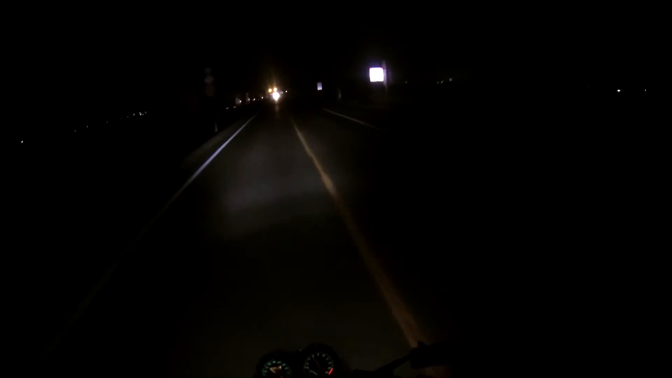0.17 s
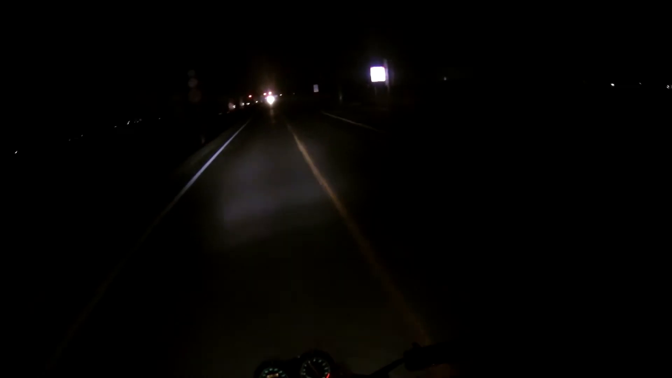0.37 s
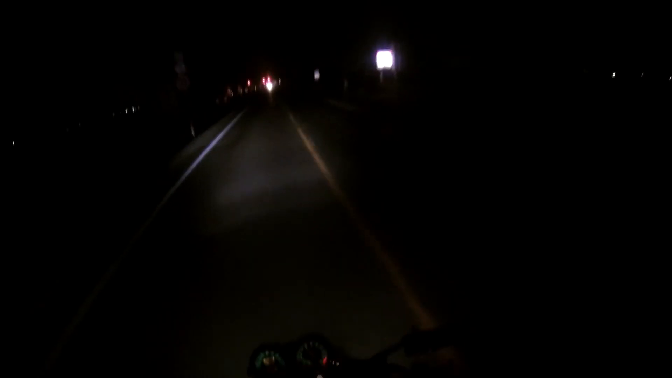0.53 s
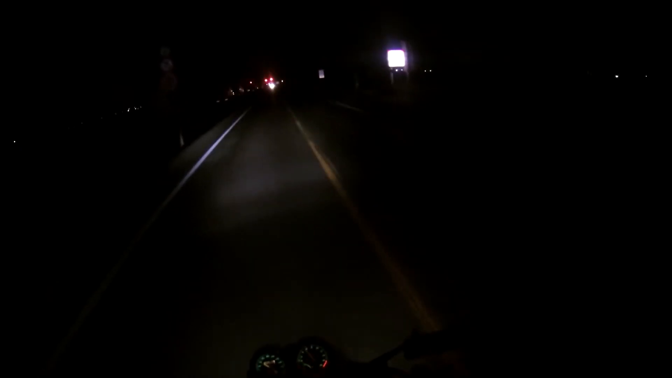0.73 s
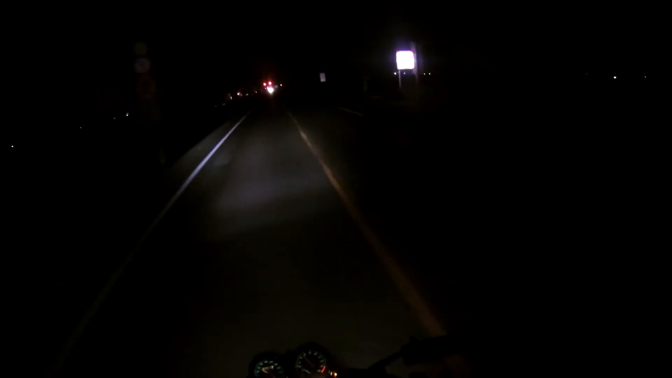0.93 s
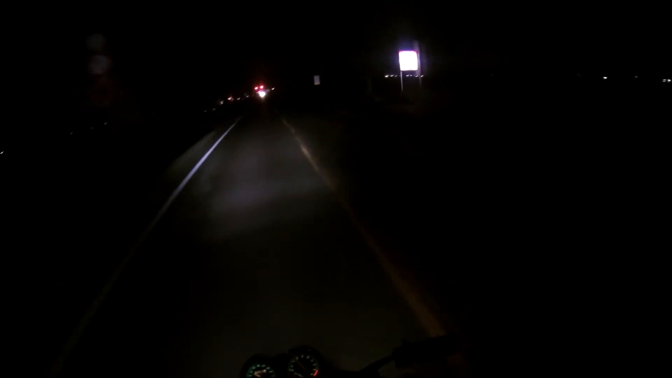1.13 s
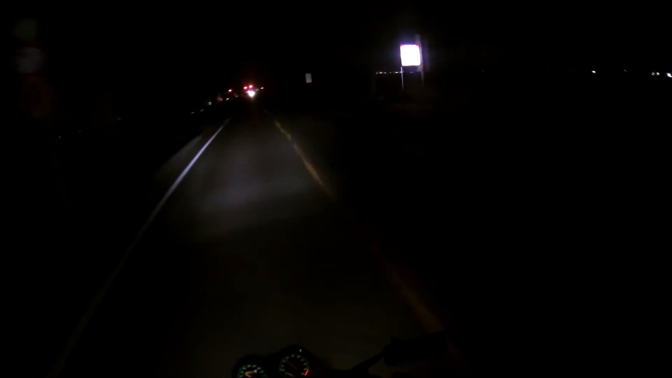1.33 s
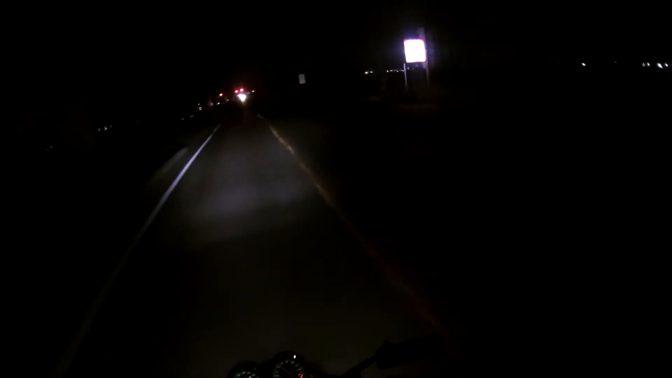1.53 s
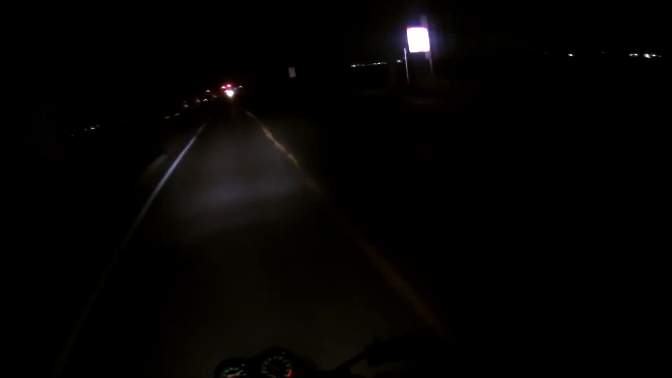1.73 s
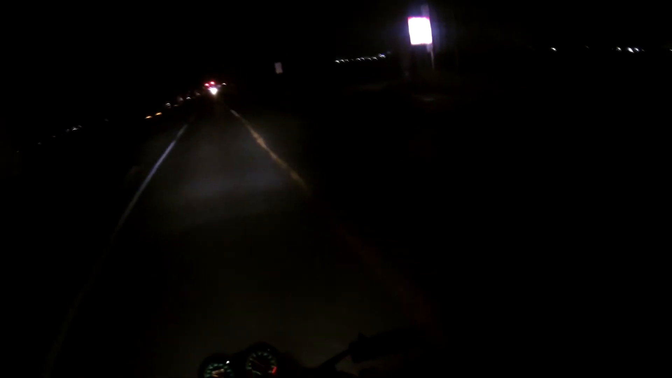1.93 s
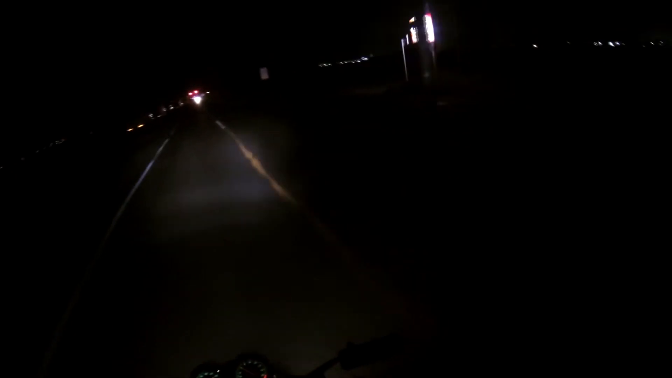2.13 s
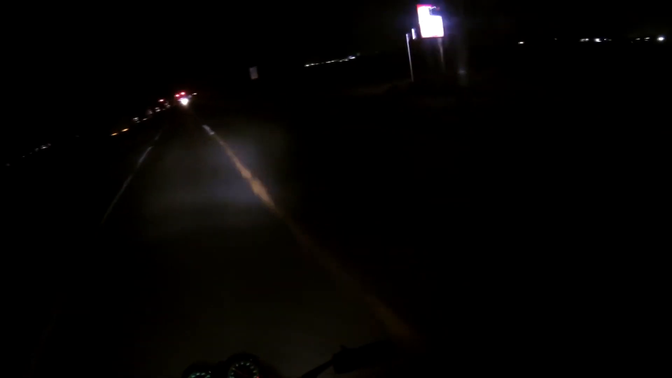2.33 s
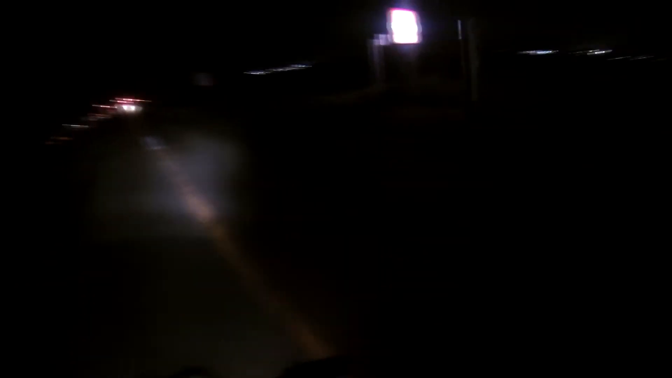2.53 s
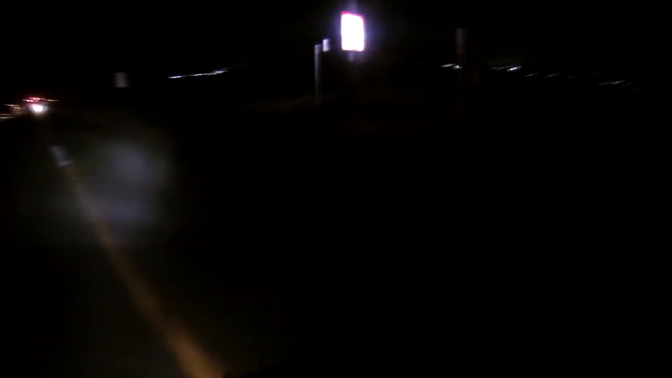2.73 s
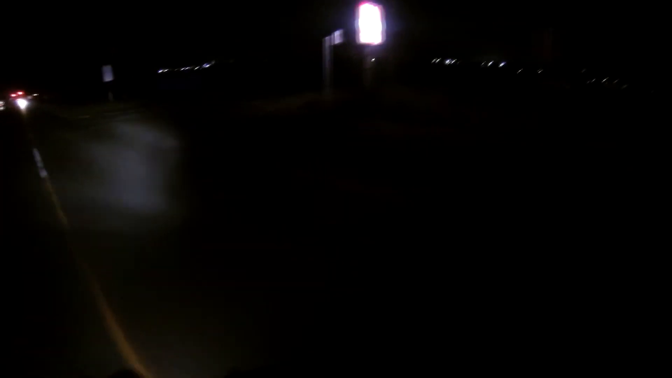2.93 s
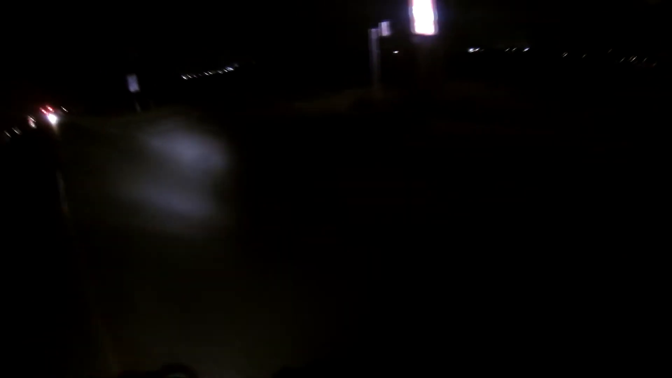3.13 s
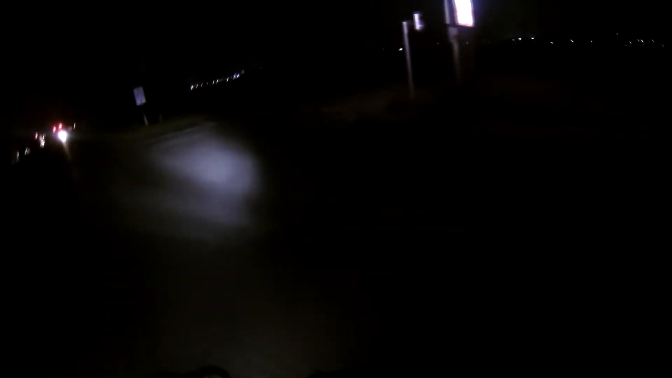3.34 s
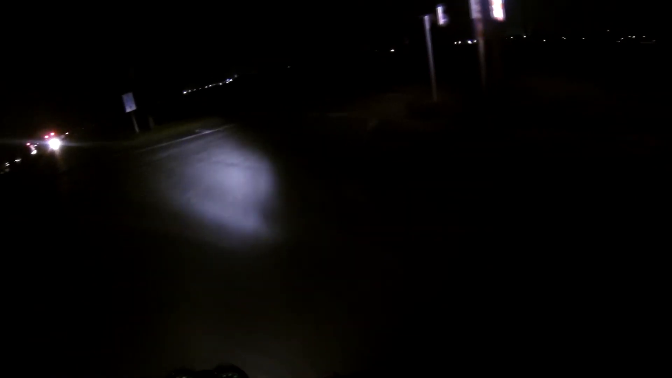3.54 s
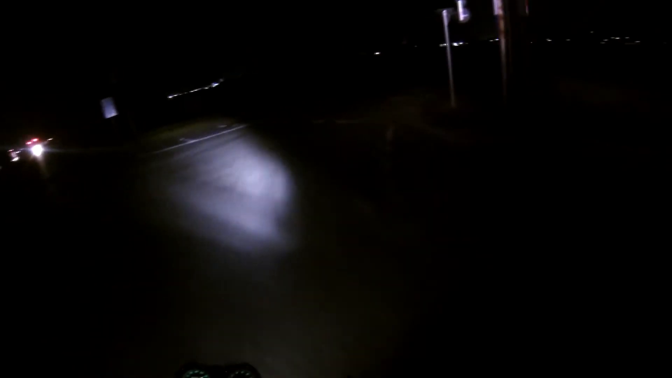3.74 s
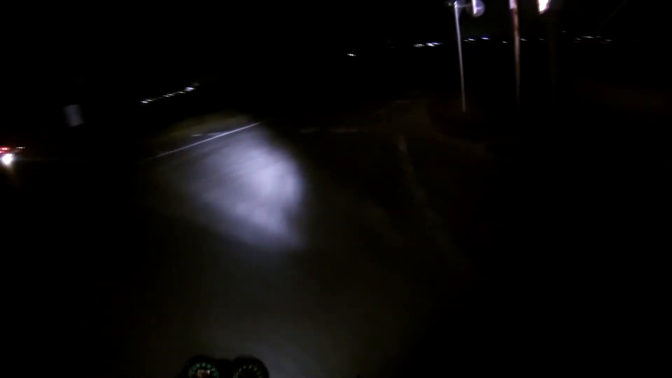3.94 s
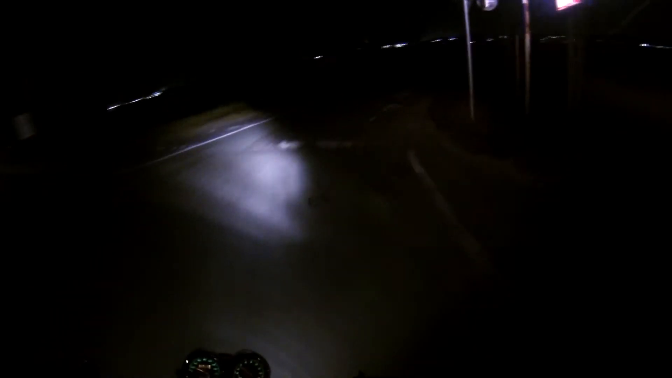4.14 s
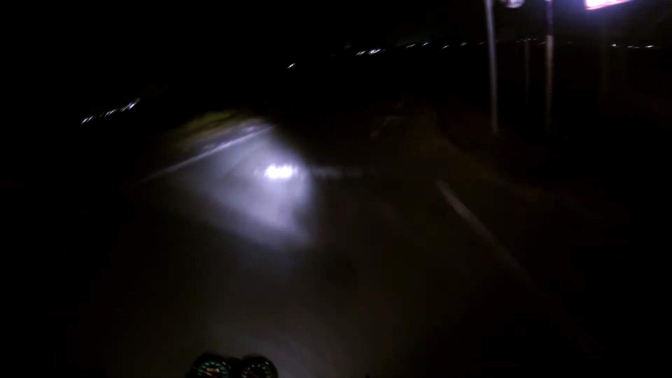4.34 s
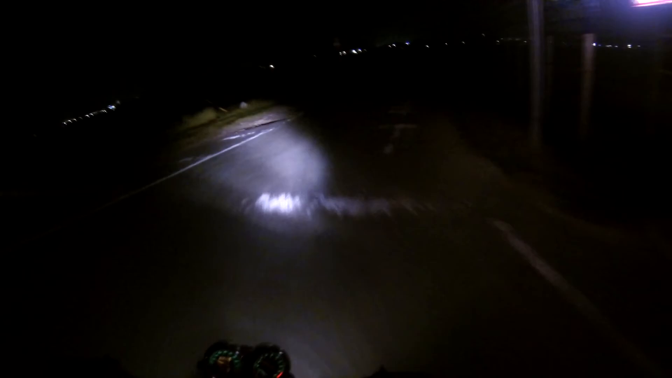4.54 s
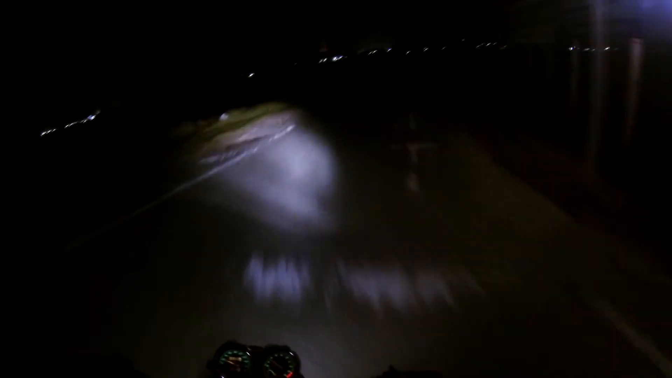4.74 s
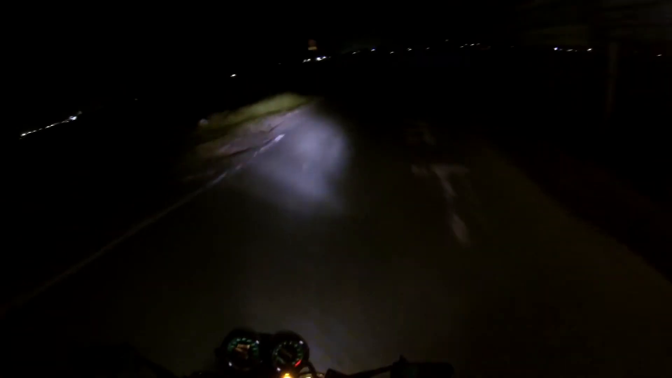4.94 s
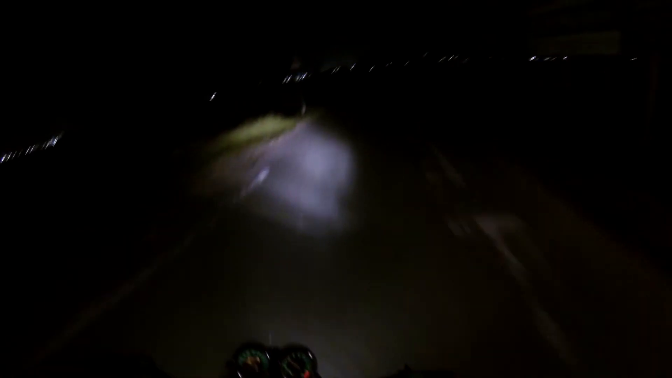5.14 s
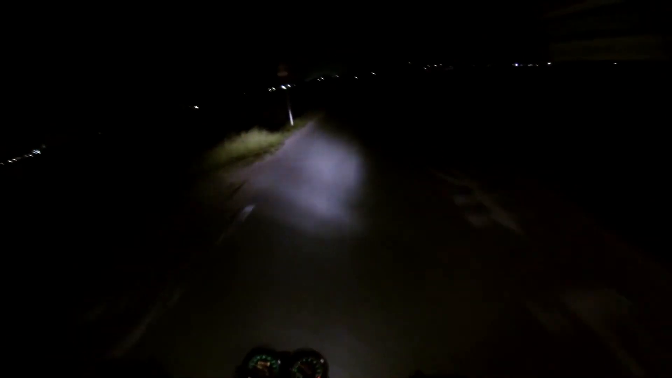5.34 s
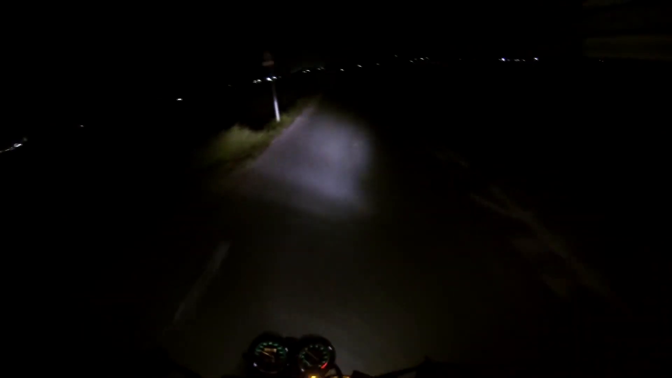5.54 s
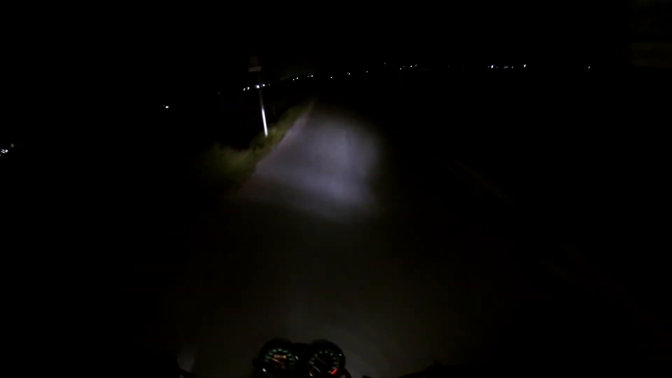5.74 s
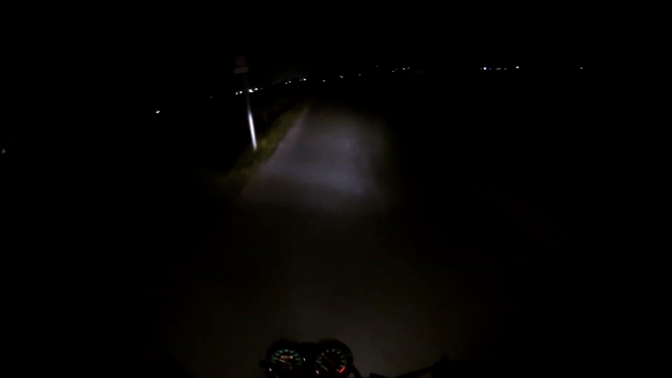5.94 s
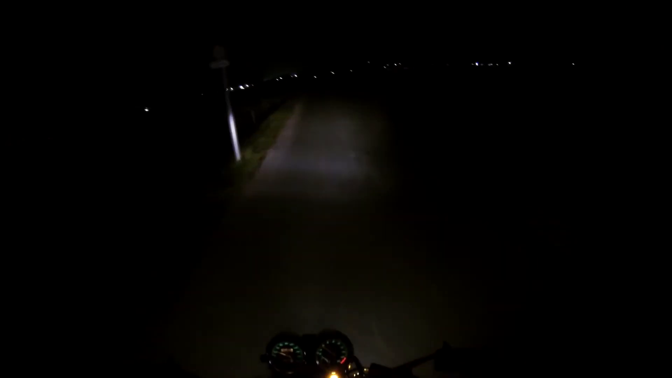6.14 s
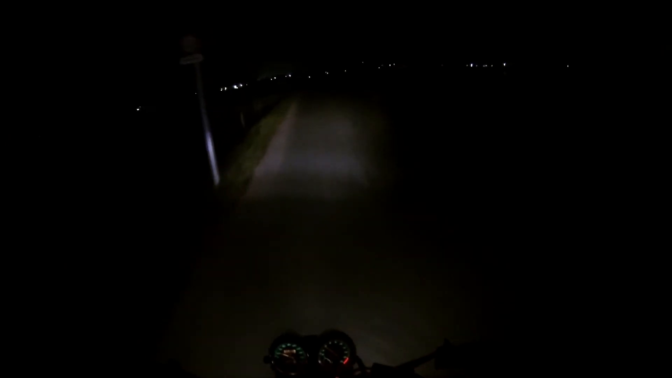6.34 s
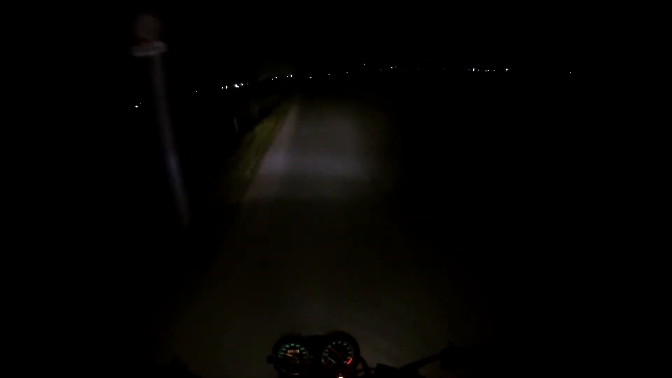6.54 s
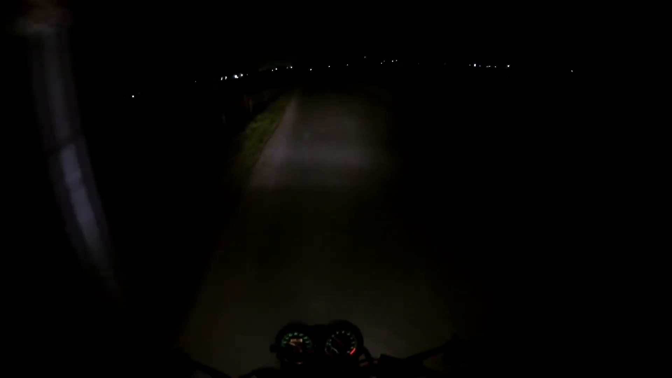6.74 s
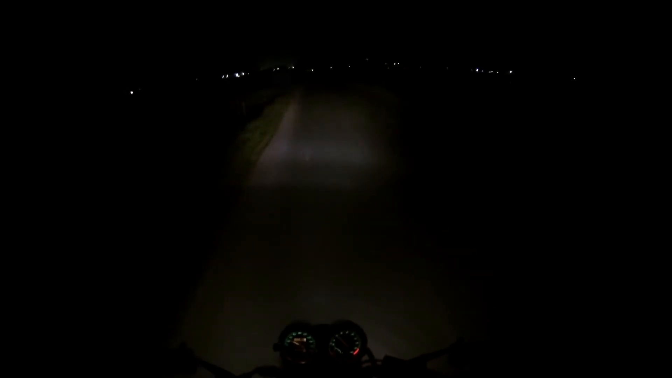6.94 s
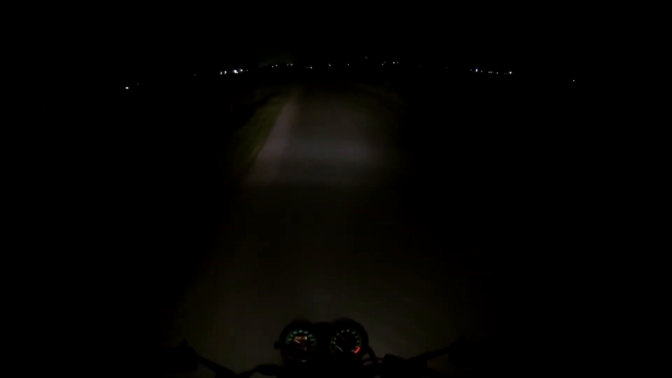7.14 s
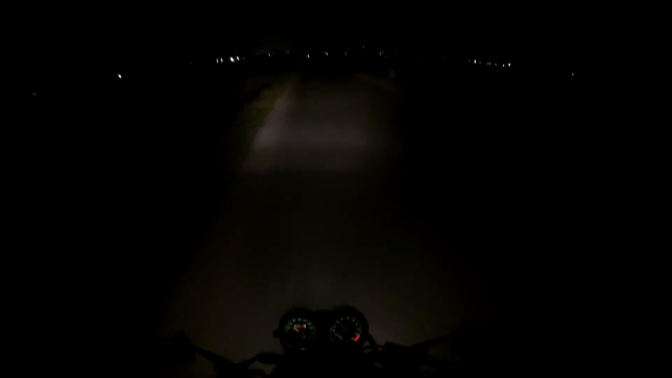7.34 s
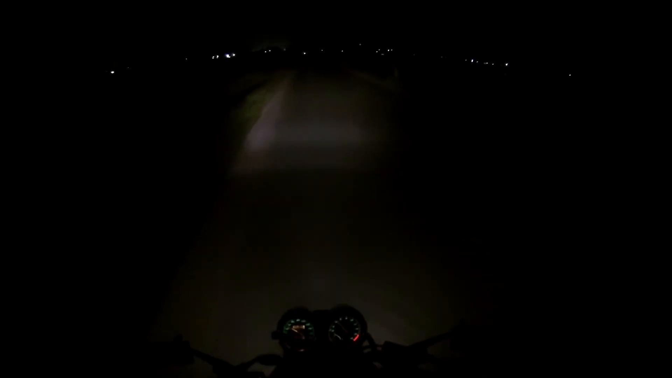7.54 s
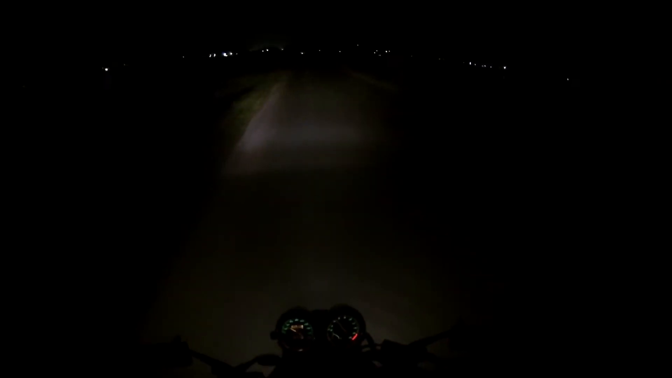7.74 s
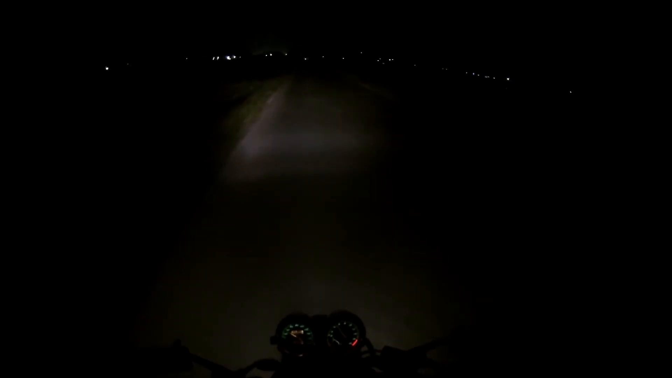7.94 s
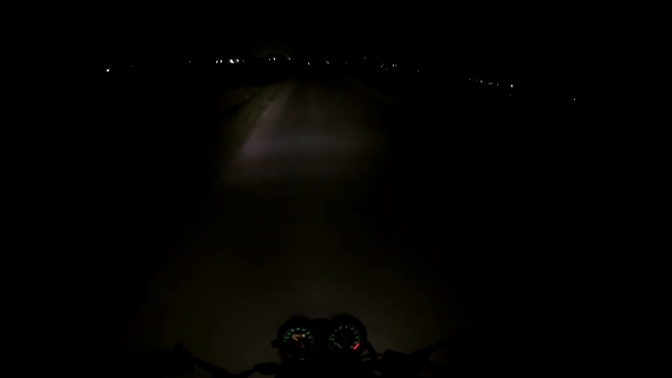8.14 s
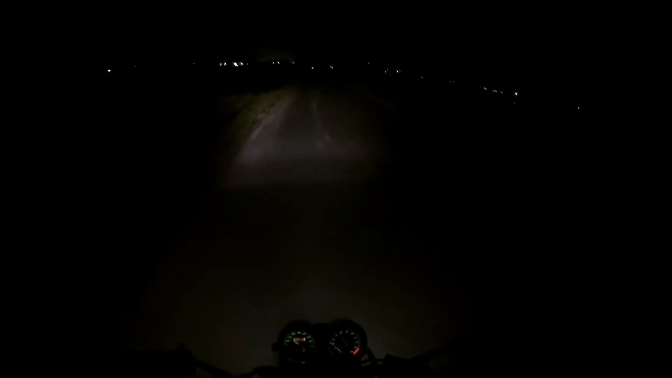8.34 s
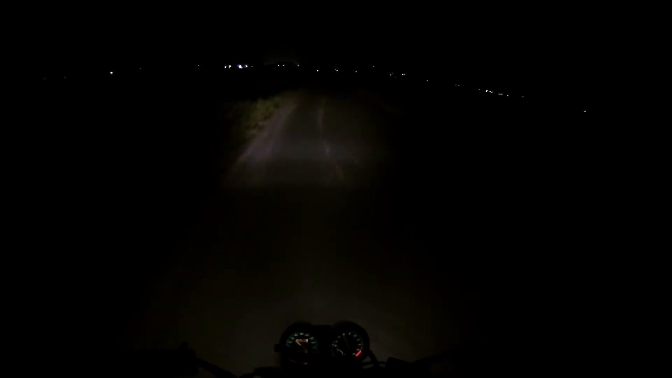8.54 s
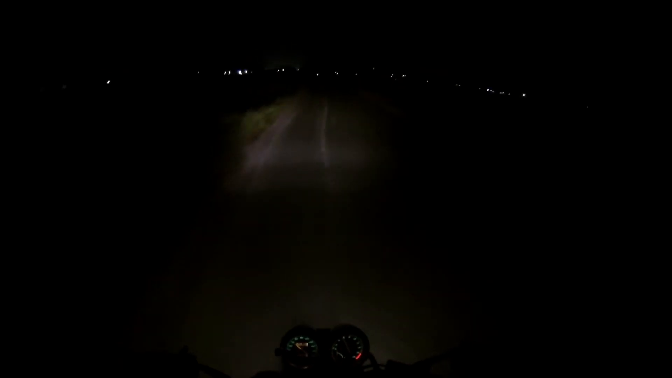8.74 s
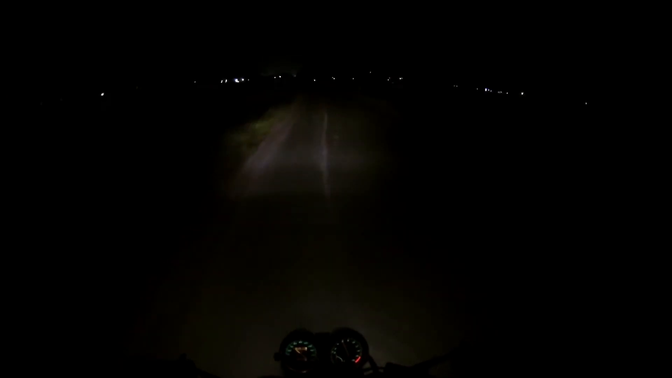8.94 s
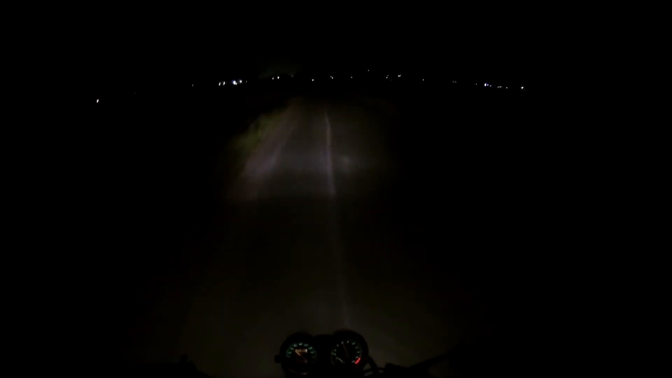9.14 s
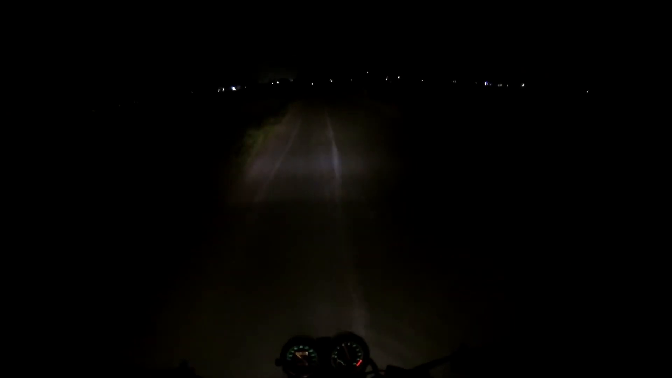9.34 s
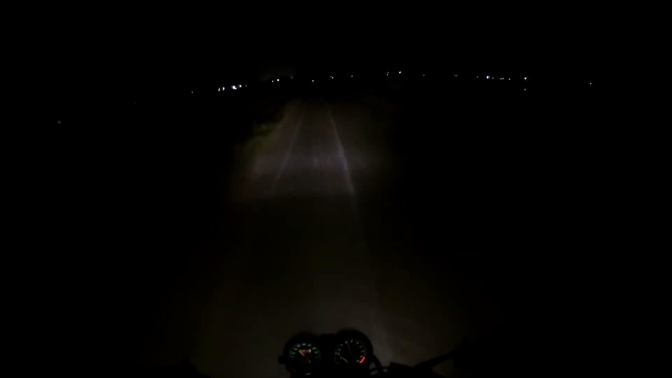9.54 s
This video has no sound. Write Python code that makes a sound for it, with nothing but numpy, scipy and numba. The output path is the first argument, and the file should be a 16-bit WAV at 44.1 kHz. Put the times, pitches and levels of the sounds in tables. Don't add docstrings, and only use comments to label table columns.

```python
import sys
import numpy as np
from scipy import signal
from scipy.fft import rfft, irfft
from scipy.io import wavfile
from scipy.ndimage import uniform_filter1d
from numba import njit

SR = 44100
rng = np.random.default_rng(int(sys.argv[2]) if len(sys.argv) > 2 else 0)


def to_wav(s):
    ch = np.atleast_2d(s).T
    pcm = np.round(np.clip(ch, -1, 1) * 32767)
    wavfile.write(sys.argv[1], SR, pcm.astype(np.int16))


def linear_from_db(decibels):
    return 10 ** (np.asarray(decibels, float) / 20)


N = 426888

# start_s, firing_rate_hz
ENGINE_SPEED = [(0, 183.5), (.64, 167.7), (1.76, 137.1), (2.4, 123.6), (3.36, 112.1), (4, 109.1),
                (4.36, 106), (4.45, 108.9), (4.51, 115.3), (4.57, 104), (4.76, 108.5), (5.1, 109),
                (5.3, 111.9), (5.77, 117.5), (6.41, 128.2), (7.21, 147), (8.49, 178.6), (9.68, 206.9)]
# start_s, opening (0-1), rasp_db per octave above 600 Hz, low_order_load_db, burble_db
THROTTLE = [(0, 0.07, -5, 3.2, 6), (.5, 0.45, -4, -0.7, 2.5), (.9, 0.16, 4, 1, 3), (1.6, 0, -1, 0.1, 1),
            (2.6, 0, 1, -0.2, 2), (3.9, 0, 9, -1.7, 3.5), (4.2, 0.48, 2, -3, 9.3),
            (4.4, 0.94, -14, -2.5, 2), (4.55, 0.92, -12, -0.5, 5.5), (5.3, 0.99, -8, 0, -5.5),
            (5.9, 0.95, -6.5, 0.5, 1.5), (6.5, 0.91, -6.5, 2, 0), (6.8, 0.91, 11, 1.8, 1),
            (7.1, 0.97, 0, .3, -2), (7.5, 0.92, -4, 1, -5.5), (8, 1, -0.5, -2, 1),
            (8.8, 0.94, 5.5, 0.36, 4.5), (9.68, 0.97, 7, -0.3, -4)]
# open_throttle_db, shut_throttle_db
LOW_ORDERS = [(11, 12), (0, 0), (-3, -7), (-9, -15)]
# pitch_hz, level_db
OPEN_CAVITY = [(100, -51), (250, -32), (330, -28), (380, -19), (415, -17), (465, -46), (600, -31.5),
               (830, -42)]
# pitch_hz, level_db
SHUT_CAVITY = [(100, -56), (245, -42), (282, -48), (322, -33), (358, -26), (398, -37), (425, -56),
               (740, -36)]
# pitch_hz, level_db
UPPER_COLOUR = [(500, 6.5), (660, 3.5), (750, 3), (830, -3), (950, -15.5), (1050, -10), (1500, -13.5),
                (1800, -27), (2300, -39.5), (3100, -34)]
# pitch_hz, width_hz, lift_db
PANELS = [(975, 60, 7), (1150, 60, 9), (1290, 50, 8), (1420, 70, 14), (2125, 60, 8), (3050, 500, -9)]
FED_ORDERS = {7: 3, 8: 2, 10: 5, 11: 4}
# multiple of firing rate, level_db re throttle
UNEVEN_LINES = [(.5, -5), (1.25, -8), (1.5, 2.5), (2.5, -12), (3.5, -2.5), (4.501, -8.5), (5.499, -9.5),
                (7.5, -4.5), (9.5, -14.5)]
# pitch_hz, level_db
UNEVEN_COLOUR = [(50, -13), (90, 7.5), (170, 3), (240, 5.5), (275, -6.5), (300, -16.5), (350, 7.5),
                 (420, 10.5), (500, -12.5), (1400, 1)]
# pitch_hz, level_db
CHAIN_COLOUR = [(1650, -74), (1900, -60), (2060, -57), (2105, -46), (2150, -46), (2185, -56), (2290, -58),
                (2420, -76)]
# multiple of firing rate, level_db
WHINE = [(20, -5), (30, 4), (40, 4), (50, 1), (60, 0)]
# pitch_hz, level_db
WHINE_COLOUR = [(2000, -70), (2250, -66), (2800, -76), (3400, -73), (4400, -83), (5250, -76), (5700, -73),
                (6050, -78), (6400, -75), (6900, -83), (7500, -87), (8300, -82), (9300, -88), (10500, -110)]
# pitch_hz, width_hz, level_db
BOOM = [(348, 28, -1), (378, 26, 0), (402, 22, -8)]
# time_s, length_ms, depth_db
MISFIRES = [(2.097, 24, -9), (2.193, 16, -9), (2.271, 21, -12), (2.399, 40, -9), (2.661, 47, -10),
            (2.751, 26, -11), (2.862, 25, -9), (2.957, 17, -8), (3.003, 41, -9), (3.13, 15, -16),
            (3.166, 19, -14), (3.228, 21, -8), (3.271, 21, -11), (3.362, 35, -10), (3.446, 29, -18),
            (3.544, 14, -10), (3.667, 20, -16), (3.778, 23, -13), (3.885, 22, -19), (3.99, 28, -12),
            (4.064, 28, -10), (4.145, 30, -9)]
# pitch_hz, width_hz, level_db, share of the swing with speed
HOUSING = [(466, 91, -14, 1.4), (678, 194, -6.5, 0.72), (987, 120, -9, 0.88), (1164, 88, -7.5, 0.99),
           (1384, 190, 1.5, 1.195), (1569, 124, -0.5, 1.08), (2192, 183, -5, 0.91), (2610, 500, -19, 1.48),
           (3260, 500, -11.5, 0.82), (3920, 620, -39, 0.76), (5133, 400, -19.5, 0.72),
           (5880, 250, -28.5, 0.7), (6400, 1200, -29.5, 0.75), (8300, 2500, -39.5, 0.67),
           (10600, 4400, -45, 0.49)]
# pitch_hz, level_db per Hz
BUFFET = [(20, -8), (35, -7), (60, -1.5), (120, -16), (200, -15.5), (300, -19.5), (450, -25), (800, -38.5),
          (2000, -52.5), (4300, -60.5), (8000, -83), (14500, -87.5)]
# time_s, length_s, level_db
GUSTS = [
    (.25, .15, 1.2),
    (.9, 0.22, 1),
    (2.014, 0.09, 2.5),
    (2.8, 0.68, 1.8),
    (4.57, 0.02, -1),
    (5.45, .1, 1.2),
    (6.995, .15, -0.5),
    (7.75, 0.53, -2),
    (8.45, .15, 0),
    (9, 0.43, -1.8),
]
# pitch_hz, width_hz, level_db
WHISTLES = [(4240, 70, -80), (4550, 70, -81), (5010, 70, -76), (5330, 50, -74), (5720, 70, -79),
            (6450, 110, -80), (7100, 120, -86), (8450, 90, -93)]
# time_s, level_db
JOINTS = [(.07, -28), (.26, -34), (.42, -31.5), (0.632, -25.5), (.93, -28), (1.36, -27.5), (1.7, -34),
          (2.052, -27.5), (2.68, -28), (3.22, -39), (5.78, -31.5), (7.53, -34.5), (7.671, -37), (7.91, -36),
          (8.191, -32), (8.351, -24), (8.751, -31), (8.969, -27), (9.169, -30.5), (9.42, -30.5),
          (9.6, -30.5)]
# time_s, level_db, pitch_hz
BUMPS = [(.07, -23, 16), (.19, -29, 44), (.31, -20.5, 16), (.53, -17, 14.7), (.7, -21.5, 13.6),
         (.87, -22, 15.3), (1.07, -27, 15), (1.19, -30, 32.6), (1.35, -24.5, 35.5), (1.51, -18, 15),
         (1.54, -37, 29), (1.74, -26, 27.2), (1.67, -18.5, 15), (1.84, -16, 17.3), (2.39, -27, 14),
         (3.33, -28, 17), (4.05, -24, 13), (4.33, -23.5, 11.1), (4.51, -24.5, 17), (4.78, -27, 14),
         (4.95, -21.5, 15), (6.02, -28, 7.1), (6.55, -30, 12), (7.16, -38, 26), (8.56, -28, 15),
         (9.18, -28, 14), (9.56, -33, 33), (9.64, -23.5, 14)]
# start_s, peak_db, ring_hz
STONES = [
    (5.3114, -20, 2170),
]
# lag_s, level_db, pitch ratio
BOUNCES = [(0, 6.5, 0.99), (0.00034, -1.0, 0.69), (.0003, -9, 1.5), (.0028, -9.0, 1.35), (0.0, -16, 1.2)]
# start_s, peak_db, pitch_hz, decay_ms
PINGS = [
    (2.42, -35, 2200, 6.8),
    (2.455, -33.5, 2290, 6),
    (2.955, -36, 2260, 7.1),
    (9.5853, -8, 1390, 1.7),
]
# pitch_hz, level_db
CIRCUIT = [(12618, -83), (12647, -97), (12678, -86), (12737, -98), (10429, -96)]


def curves(table):
    s, *columns = np.transpose(table)
    return [np.interp(np.arange(N) / SR, s, c) for c in columns]


def colour(table, hz):
    f, db = np.transpose(table)
    return np.interp(np.log(hz), np.log(f), db)


def unit(x):
    return x / np.sqrt(np.mean(x ** 2))


def octaves(hz):
    return np.log2(hz / 109)


def mix(share, shut, opened):
    return shut + np.clip(share, 0, 1) * (opened - shut)


def dip(hz, centre_hz, width_hz, db):
    return db / (1 + (2 * (hz - centre_hz) / width_hz) ** 2)


@njit
def svf(x, hz, width):
    y, b, l = np.empty(len(x)), 0., 0.
    g, k = np.tan(np.pi * hz / SR), width / hz
    for i in range(len(x)):
        v = (b + g * (x[i] - l)) / (1 + g * (g + k))
        b, l, y[i] = 2 * v - b, l + 2 * g * v, k * v
    return y


def steep(x, hz, width):
    return svf(svf(x, 1. * hz, 1. * width), 1. * hz, 1. * width)


def walk(rate):
    k = int(SR / rate)
    held = np.repeat(rng.standard_normal(N // k + 1), k)
    return unit(uniform_filter1d(uniform_filter1d(held, k), k)[:N])


def resonance(hz, width, cycle, flicker_db, gate):
    band = steep(rng.standard_normal(N), hz, 1.66 * width)
    breath = 1 + gate * np.cos(cycle)
    return unit(band) * linear_from_db(flicker_db * walk(5.8)) * np.sqrt(width) * breath


def swells(rows, seconds):
    t, out = np.arange(N) / SR, np.zeros(N)
    for s, db, hz in rows:
        shape = np.exp(-((t - s) / seconds) ** 2)
        out += np.sqrt(2) * linear_from_db(db) * shape * np.cos(2 * np.pi * hz * (t - s))
    return out


def electronics():
    t = np.arange(N) / SR
    tones = sum(np.sqrt(2) * linear_from_db(db) * np.sin(2 * np.pi * f * t) for f, db in CIRCUIT)
    return tones + linear_from_db(-85.5) * rng.standard_normal(N)


def buffeting(hz, grip):
    f = np.maximum(np.arange(N // 2 + 1) * SR / N, 1)
    spectrum = rfft(rng.standard_normal(N)) * linear_from_db(colour(BUFFET, f)) * (f > 22)
    flutter = linear_from_db(1.2 * walk(9))
    db_per_octave = mix(grip, 18.5, 5.5)
    return unit(irfft(spectrum, N)) * flutter * linear_from_db(-42 + db_per_octave * octaves(hz))


def gusts():
    t = np.arange(N) / SR
    return sum(db * np.exp(-((t - s) / length) ** 2) for s, length, db in GUSTS)


def housing_rush(hz, grip, cycle):
    speed = octaves(hz)
    throttle_db = grip * (2.5 - 5.5 * speed)
    swing_db = -7 + 24 * speed + throttle_db + gusts()
    rush = np.zeros(N)
    for peak_hz, width, db, share in HOUSING:
        level_db = db - 69.5 + share * swing_db
        rush += linear_from_db(level_db) * resonance(peak_hz, width, cycle, flicker_db=0.98, gate=0.023)
    return rush


def whistles(hz):
    tones = np.zeros(N)
    for f, width, db in WHISTLES:
        tones += linear_from_db(db + 5.0 * walk(2.7)) * unit(steep(rng.standard_normal(N), f, width))
    return tones * linear_from_db(3 * octaves(hz))


def mount_hum(hz, cycle):
    hum = unit(resonance(86, 12, cycle, flicker_db=.5, gate=0))
    joints = swells([(s, db, 85) for s, db in JOINTS], seconds=0.038)
    return hum * linear_from_db(-47 + 18.5 * octaves(hz)) + joints


def frame_shake(hz, cycle):
    shake = svf(resonance(14, 10.0, cycle, flicker_db=1.5, gate=0), 12.0, 14.0)
    return unit(shake) * linear_from_db(-32.5 - octaves(hz)) - swells(BUMPS, seconds=0.093)


def stone_ticks():
    out, t = np.zeros(N), np.arange(int(.04 * SR)) / SR
    shape = np.exp(-t / 0.00061) * (1 - np.exp(-t / 0.00025)) ** 2 * 1.56
    for s, db, hz in STONES:
        for lag, bounce_db, ratio in BOUNCES:
            i = int((s + lag) * SR)
            out[i:i + len(t)] += linear_from_db(db + bounce_db) * np.sin(2 * np.pi * ratio * hz * t) * shape
        crack = steep(rng.standard_normal(len(t)), 8800, 3500) * np.exp(-t / 0.001)
        i = int(s * SR)
        out[i:i + len(t)] += linear_from_db(db - 10) * crack * (1 - np.exp(-t / .0003))
    return out


def fairing_pings():
    out, t = np.zeros(N), np.arange(int(.04 * SR)) / SR
    for s, db, hz, ms in PINGS:
        i = int(s * SR)
        shape = np.exp(-1000 * t / ms) * (1 - np.exp(-t / 0.00068))
        out[i:i + len(t)] += linear_from_db(db) * np.sin(2 * np.pi * hz * t) * shape
    return out


def rattle(hz, grip):
    clicks_per_s = 120
    chance = rng.random((int(clicks_per_s * N / SR), 2))
    clicks = np.zeros(N)
    clicks[(chance[:, 0] * N).astype(int)] = linear_from_db(-2.5 * np.log(chance[:, 1] + 1e-2))
    ring = steep(clicks, 9100, 900) + .7 * steep(clicks, 11300, 800)
    return unit(ring) * linear_from_db(-95 + grip * dip(hz, 148, 30, 21.5))


def misfires():
    t = np.arange(N) / SR
    return linear_from_db(sum(1.15 * db * np.exp(-(2000 * (t - s) / ms) ** 2) for s, ms, db in MISFIRES))


def burble(grip, cycle):
    firings = np.flatnonzero(np.diff((cycle / (2 * np.pi)).astype(int)))
    size = rng.standard_normal(N // 100)[:len(firings)]
    push = np.zeros(N)
    push[firings] = np.sign(size) * np.sqrt(np.abs(size))
    push *= linear_from_db(1.3 * walk(35))
    ring = np.zeros(N)
    for f, width, db in BOOM:
        ring += linear_from_db(db) * svf(svf(push, 1. * f, 1. * width), 1. * f, 0.97 * width)
    thud = linear_from_db(-17.5) * svf(svf(push, 165., 90.), 165., 120.)
    level_db = mix(grip, -42, -44) + curves(THROTTLE)[3]
    return unit(svf(ring, 387.5, 110.0) + thud) * misfires() * linear_from_db(level_db)


def engine_line(k, cycle, db, waver, smear=0):
    level = np.sqrt(2) * linear_from_db(db + 5 * waver * walk(18))
    return level * np.sin(k * cycle + waver * walk(14) + smear + 2 * np.pi * rng.random())


def whine(hz, cycle):
    out = np.zeros(N)
    for k, db in WHINE:
        level_db = db + colour(WHINE_COLOUR, k * hz) + 2 * walk(5)
        out += engine_line(k, cycle, level_db, .5, smear=.0008 * k ** 2 * walk(60))
    return out


def cam_chain(hz, grip, cycle):
    return grip * engine_line(15, cycle, colour(CHAIN_COLOUR, 15 * hz), .3)


def upper_db(hz, grip):
    return mix(grip, -77.5 + 8 * octaves(hz), -58.5 + 22.5 * octaves(hz))


def uneven_firing(hz, grip, cycle):
    out = np.zeros(N)
    for k, db in UNEVEN_LINES:
        out += engine_line(k, cycle, upper_db(hz, grip) + db + colour(UNEVEN_COLOUR, k * hz), 0.076)
    return out


def path_db(hz):
    return colour(UPPER_COLOUR, hz) + sum(dip(hz, f, width, db) for f, width, db in PANELS)


def upper_orders(hz, grip, cycle):
    rasp_db = curves(THROTTLE)[1]
    out = np.zeros(N)
    for k in range(5, 18):
        bright_db = rasp_db * np.clip(np.log2(k * hz / 600), 0, 0.99)
        level_db = upper_db(hz, grip) + bright_db + path_db(k * hz) + FED_ORDERS.get(k, 0)
        out += engine_line(k, cycle, level_db, .2 + .018 * k)
    return out


def cavity_db(k, hz, grip):
    open_db, shut_db = LOW_ORDERS[k - 1]
    pitch = k * hz
    shut = shut_db + colour(SHUT_CAVITY, pitch) + dip(pitch, 318, 9, -22)
    opened = open_db + colour(OPEN_CAVITY, pitch) + dip(pitch, 305, 25.7, -31.5)
    return mix(grip ** 2, shut, opened)


def low_orders(hz, grip, cycle):
    load_db = curves(THROTTLE)[2]
    overrun = np.clip(1 - 2 * grip, 0, 1)
    low = []
    for k in range(1, 5):
        waver = 0.071 + (0.016 + 0.12 * overrun) * (k - 1)
        low.append(engine_line(k, cycle, load_db + cavity_db(k, hz, grip), waver))
    skip = misfires()
    return low[0] + low[1] * np.sqrt(skip) + (low[2] + low[3]) * skip


def scene():
    hz, grip = curves(ENGINE_SPEED)[0], curves(THROTTLE)[0]
    cycle = 2 * np.pi * np.cumsum(hz) / SR
    wind = buffeting(hz, grip) + housing_rush(hz, grip, cycle) + whistles(hz)
    body = mount_hum(hz, cycle) + frame_shake(hz, cycle) + rattle(hz, grip)
    knocks = stone_ticks() + fairing_pings()
    gear = whine(hz, cycle) + cam_chain(hz, grip, cycle)
    exhaust = uneven_firing(hz, grip, cycle) + upper_orders(hz, grip, cycle) + low_orders(hz, grip, cycle)
    engine = burble(grip, cycle) + gear + exhaust
    return (electronics() + wind + body + knocks + engine)[None]


def band_limit(x):
    return signal.sosfilt(signal.butter(12, 15140, fs=SR, output="sos"), x)


def record(dry):
    low_pass = signal.ellip(6, .5, 50, 14800, fs=SR, output="sos")
    dull = signal.sosfilt(low_pass, dry)
    return band_limit(dull)


dry = scene()
out = record(dry)
to_wav(out)
```